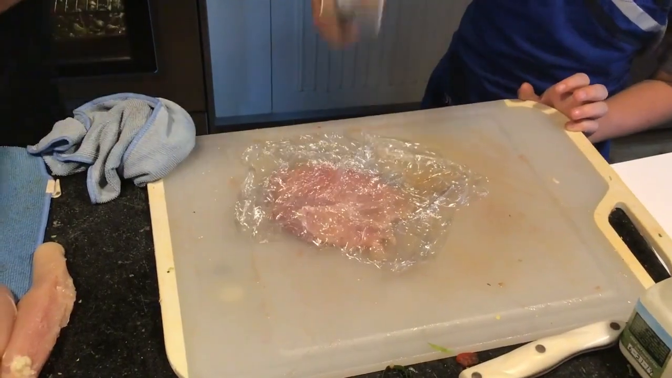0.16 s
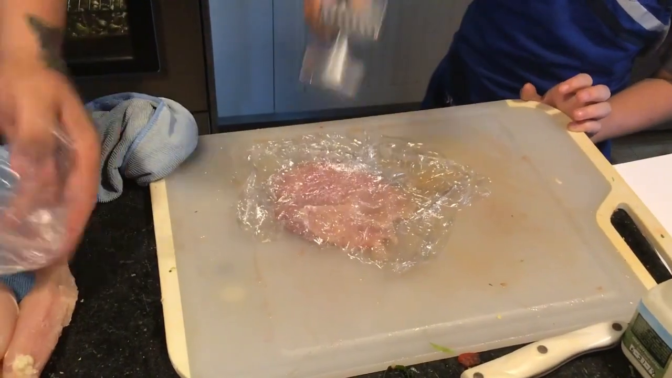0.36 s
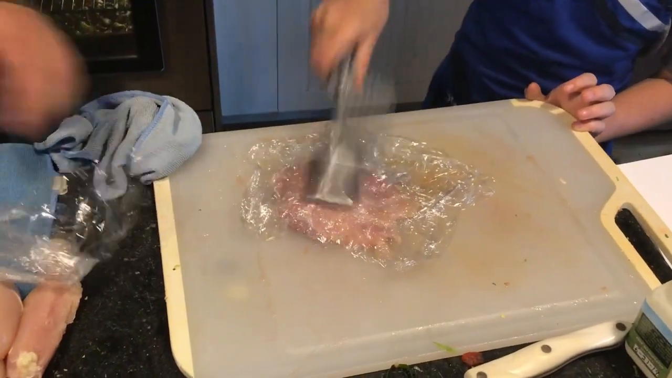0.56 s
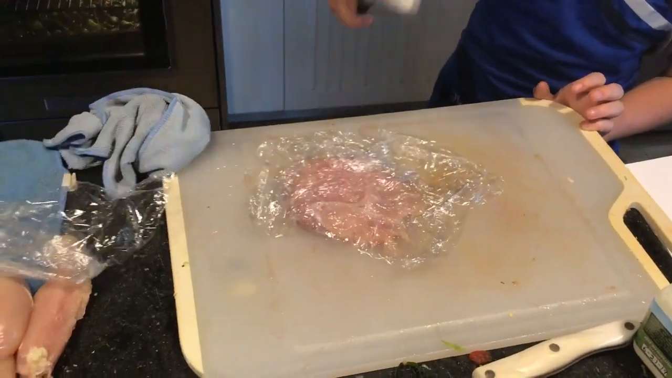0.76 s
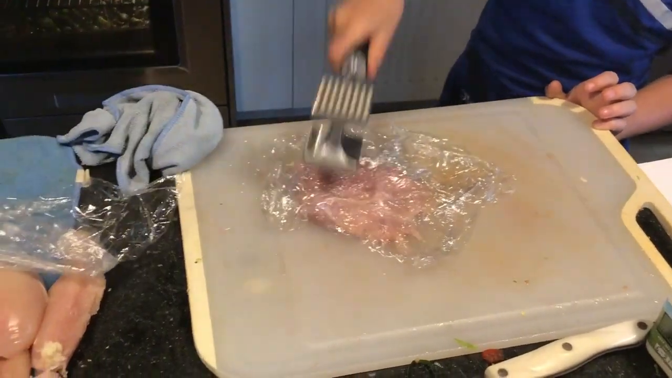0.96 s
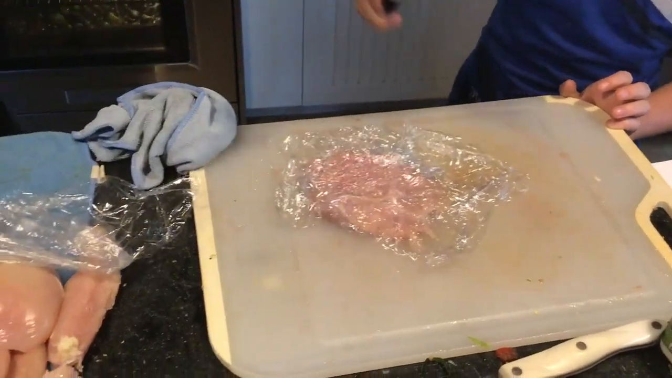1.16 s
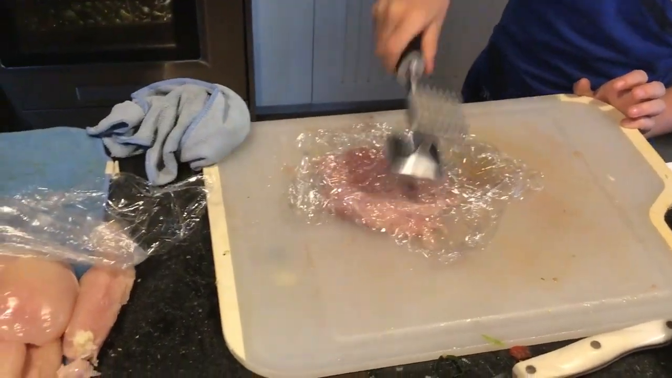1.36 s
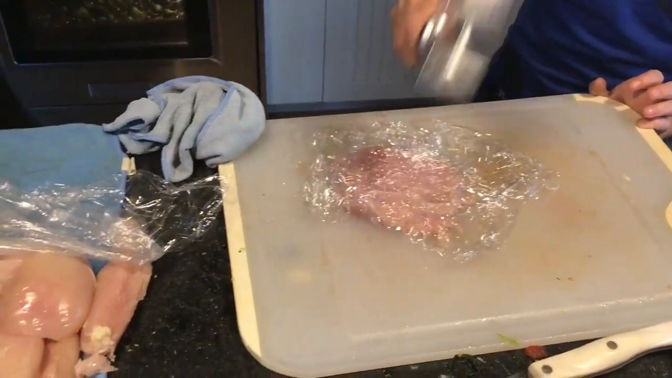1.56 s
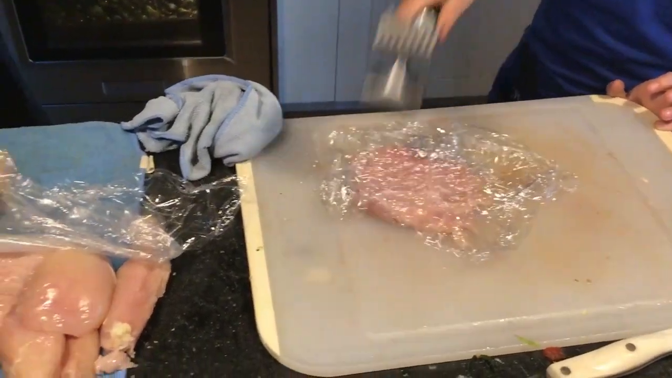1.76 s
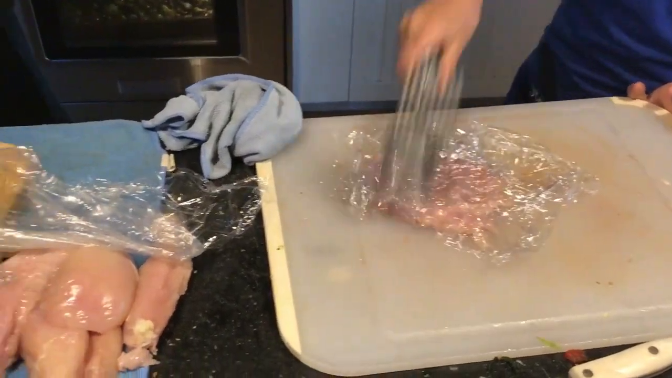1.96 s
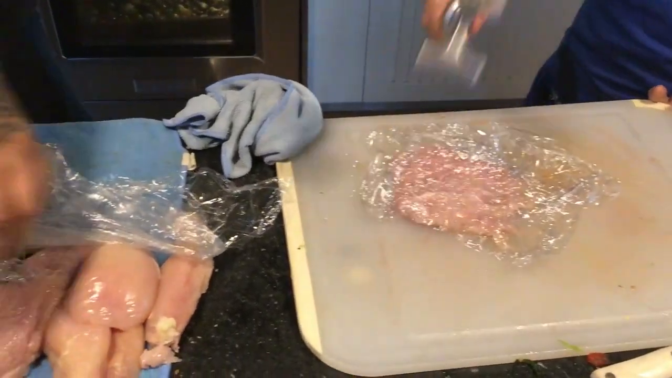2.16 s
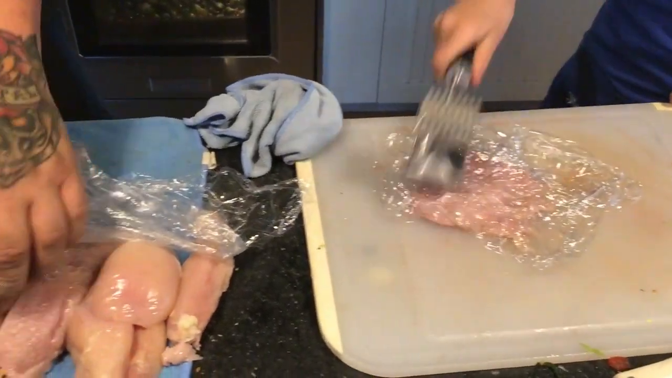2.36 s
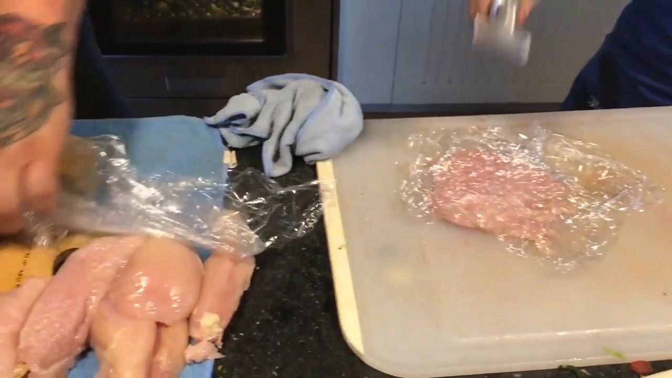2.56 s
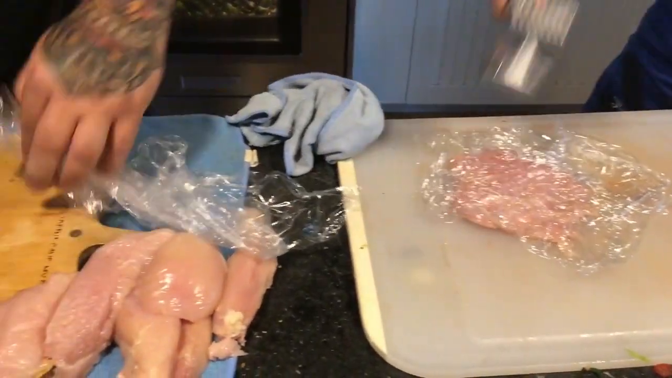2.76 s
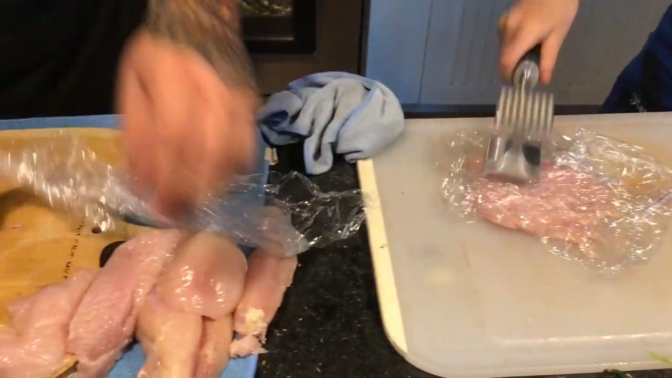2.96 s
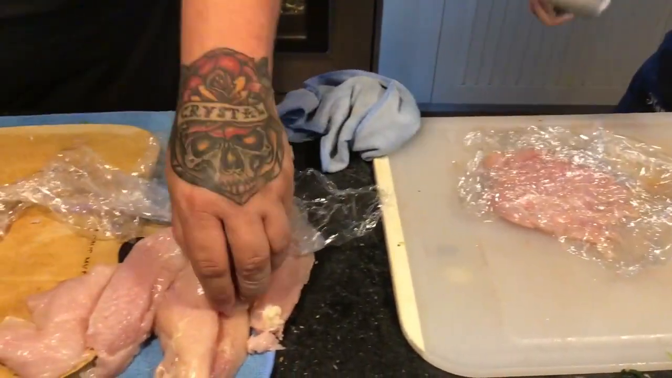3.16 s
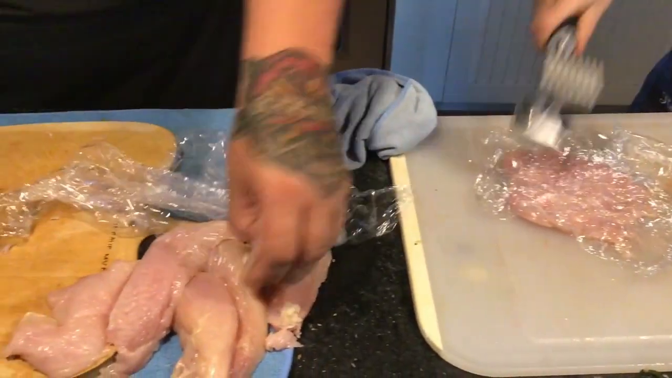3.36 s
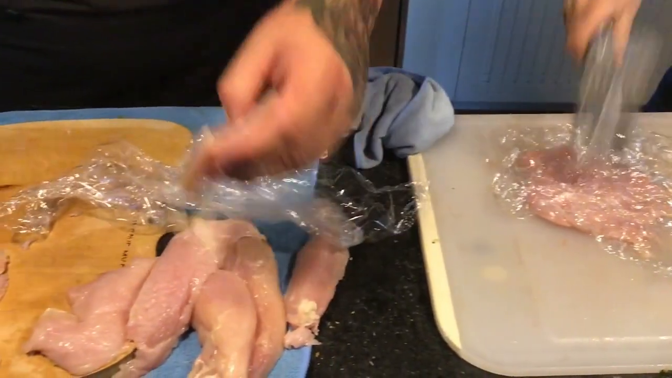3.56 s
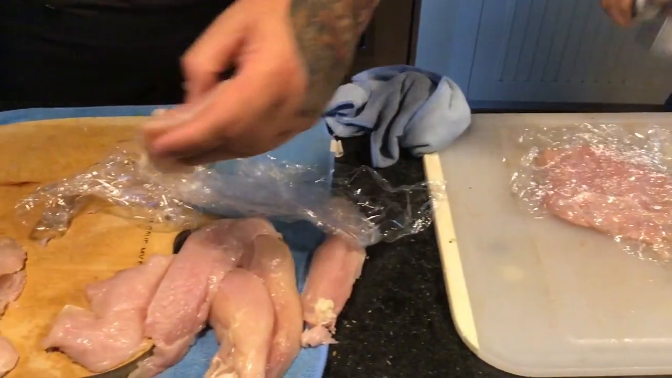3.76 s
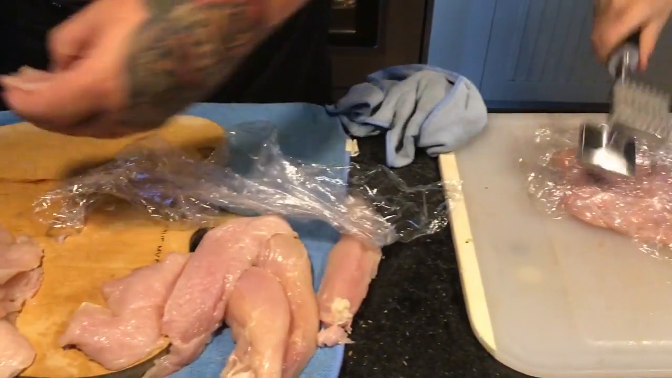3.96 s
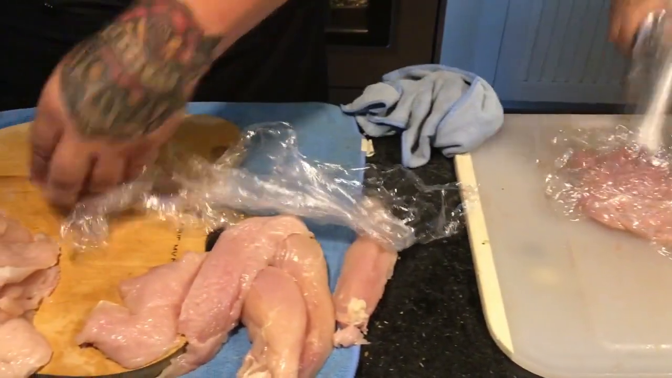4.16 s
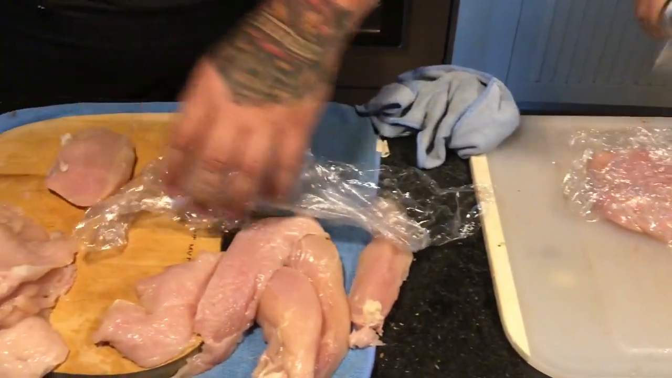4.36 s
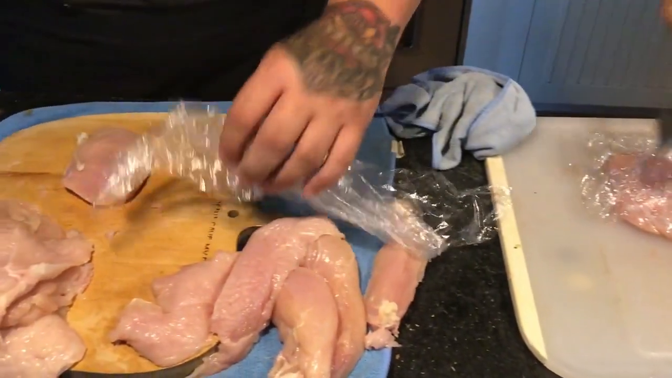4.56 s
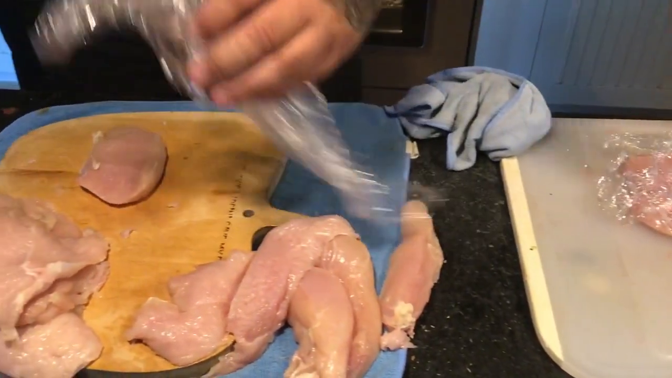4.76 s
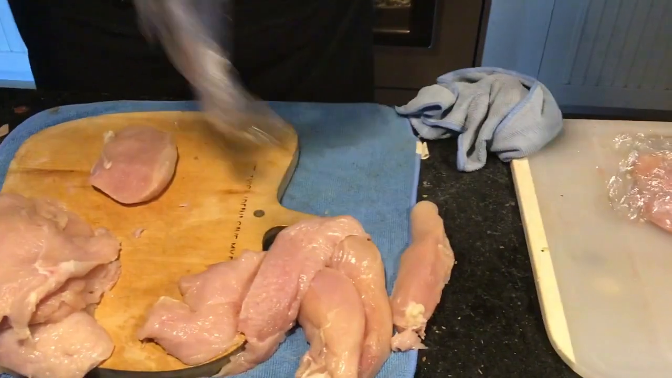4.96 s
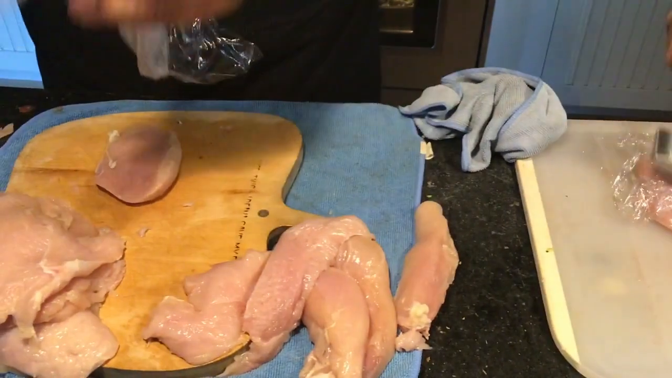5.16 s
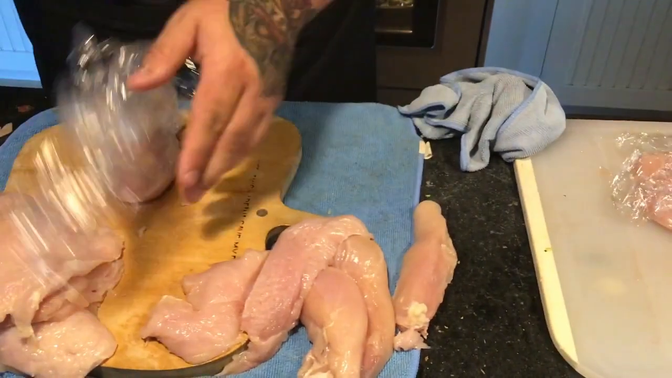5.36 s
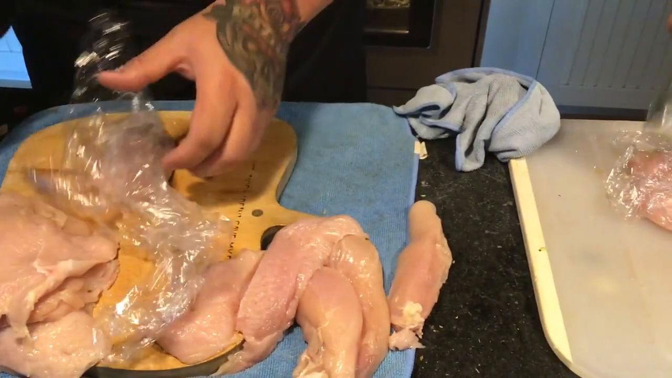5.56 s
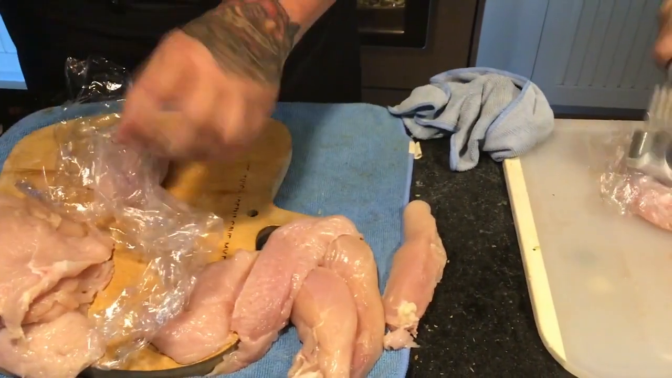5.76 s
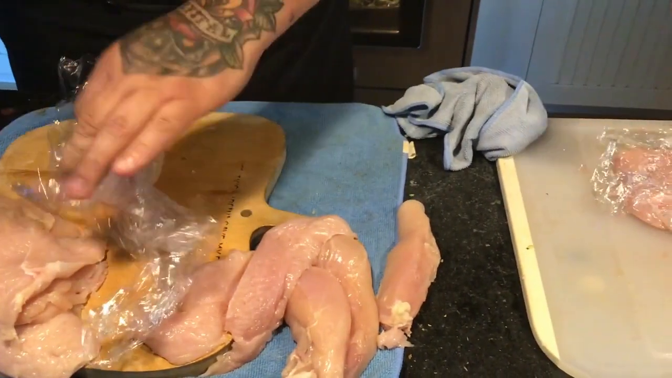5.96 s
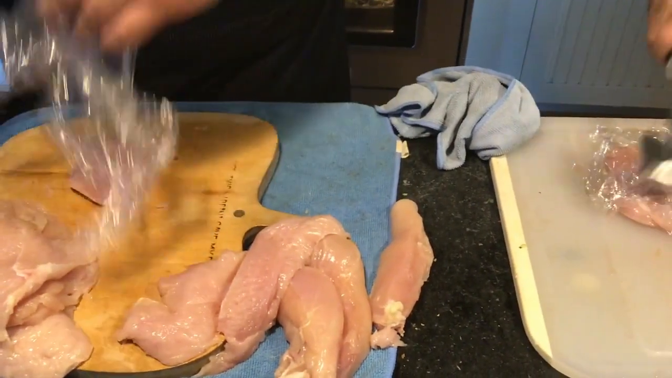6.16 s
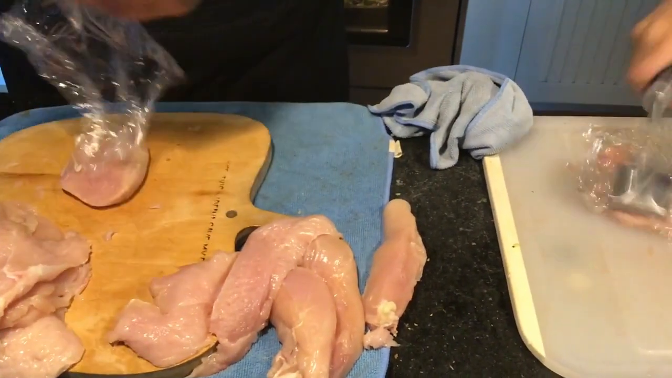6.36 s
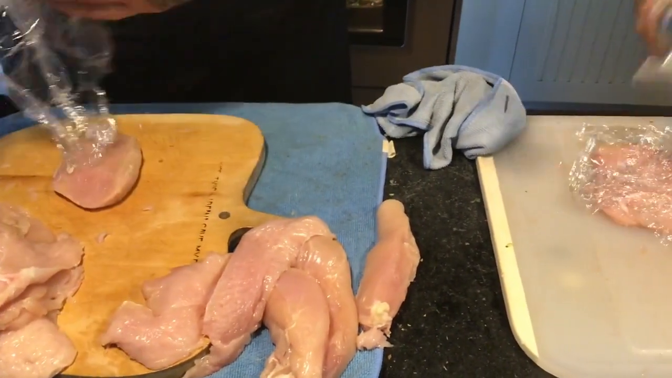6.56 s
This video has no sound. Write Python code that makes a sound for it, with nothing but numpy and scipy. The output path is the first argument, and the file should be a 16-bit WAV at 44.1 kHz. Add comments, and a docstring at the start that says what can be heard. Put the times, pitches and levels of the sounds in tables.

```python
"""Wet slaps and knocks, about three a second: a metal mallet pounds a chicken breast under plastic wrap
on a plastic cutting board, close to a stereo microphone pair in a home kitchen. Each blow slaps the film
with a puff of trapped air; some 4 ms later the meat is squeezed flat and the board knocks on the counter.
Beside it someone handles a second sheet of wrap, which rustles, snaps and swishes, and hands and meat
bump softly on the boards. The kitchen rings briefly behind it all, over a faint room tone."""
import sys
import numpy as np
from scipy import signal
from scipy.fft import rfft, irfft, next_fast_len
from scipy.io import wavfile

SR = 44100
rng = np.random.default_rng(int(sys.argv[2]) if len(sys.argv) > 2 else 0)


def inscribe(sig):
    """Save sig as 16-bit PCM at rate SR to the path in sys.argv[1].

    A 1-D sig is mono; a 2-D sig holds one channel per row.
    Samples are clipped to [-1, 1] before scaling.
    """
    pcm = np.round(np.clip(np.atleast_2d(sig).T, -1, 1) * 32767)
    wavfile.write(sys.argv[1], SR, pcm.astype(np.int16))


N = 291627
LEAD = SR // 4   # samples before time zero: the first blow lands just ahead of it
SPAN = next_fast_len(N + LEAD, real=True)

# mallet blows: (time [s], slap [dB], squirt pitch [Hz], air puff [dB], squeeze time [ms], knock [dB],
# board pitch [ratio])
BLOWS = [ (-.062, 4.5, 5940, -7, 4, 10.5, 0.91), (0.288, 9, 8500, 1, 4.1, 11, 1.04),
         (0.6338, 9.5, 6700, 2, 4, 12, 1.03), (.9801, 12, 8500, 4, 4.3, 14, 1.073),
         (1.3382, 10, 7200, 4.5, 4, 12, .97), (1.6854, 5.5, 5020, 0.5, 3.8, 9.5, 1.035),
         (2.0433, -0.5, 7000, -1, 3.5, 8, 1.08), (2.3851, -5.5, 5750, 1.5, 4, 6, 1.02),
         (2.7005, -4.5, 5340, -8, 6.5, 8, .98), (3.0198, 12, 7330, 0.5, 4.2, 12.5, 0.96),
         (3.3369, 4.5, 6640, -7, 4.3, 12.5, 1.015), (3.647, 5, 5190, 7, 4.4, 12.5, 0.96),
         (3.9588, 5, 5000, -1.5, 4.1, 8.5, 1.02), (4.2555, 11, 3730, 3, 4.5, 13, 1.02),
         (4.556, 5, 4080, 5, 4, 12, 1.003), (4.873, 8.5, 7500, 9.5, 4.6, 13, 1.01),
         (5.191, 14.5, 3200, 7.5, 5.6, 13.5, 1), (5.517, 6.5, 5500, 7, 4.9, 14, 0.92),
         (5.8234, 7, 5900, 9.5, 5.1, 13, 0.96), (6.148, 3, 3320, -3, 5.2, 6.5, 1),
         (6.4297, 7.5, 3460, 5.5, 3.3, 11.5, 1.03)]
# hiss of the wet film: (frequency [Hz], spectral level [dB])
SLAP_COLOUR = [(400, -27), (1200, 2), (2000, -4), (5000, -5.5), (7500, -5.5), (10500, -4), (13000, -10.5),
               (16000, -11.5)]
# board under the meat; stiffer spots favour other modes: (frequency [Hz], relative level [dB], t60 [s],
# share struck again by the rebound [ratio], level change [dB per unit of pitch ratio])
BOARD_MODES = [(215, -8, 0.025, 0.029, 5.5), (244, -9.5, .02, 0.062, 12), (456, -15, 0.039, 0.77, 0),
               (705, -0.5, 0.03, 0.18, -1), (1098, -7.5, 0.027, 0.98, 17), (1605, -11.5, 0.023, .9, 2)]
# hard contact of head and board: (frequency [Hz], spectral level [dB])
CRACK_COLOUR = [(500, -14), (1100, -19), (1900, 4.5), (3200, 2), (4500, 4), (6200, 0), (8000, -14.5),
                (12000, -14), (16000, -30.5)]
# counter under the board: (frequency [Hz], relative level [dB], t60 [s])
COUNTER_MODES = [(590, -49, 0.24), (683, -37.5, 0.6), (720, -42, 0.5), (800, -42.5, 0.48),
                 (966, -43.5, 0.55), (1224, -46, 0.27)]
# low standing waves of the kitchen: (frequency [Hz], relative level [dB], t60 [s])
ROOM_MODES = [(83.85, -47, 0.66), (134.2, -39.5, 0.43), (168.5, -45, .4), (175.4, -42, 0.4),
              (213.4, -45, .45)]
# reverberation of the kitchen: (frequency [Hz], level [dB])
ROOM_COLOUR = [(60, -5), (130, -11), (220, -8.5), (350, -4), (700, -9.5), (1100, -8), (2000, -10),
               (4500, -6.5), (8000, -9.5), (12000, -9.5), (16000, -18)]
# its decay: (frequency [Hz], t60 [s])
ROOM_T60 = [(100, 0.93), (300, 0.44), (700, 0.47), (2000, 0.44), (5000, 0.45), (9000, 0.34), (15000, 0.24)]
# its likeness at the two microphones: (frequency [Hz], correlation [ratio])
ROOM_LIKENESS = [(60, 0.95), (180, 0.94), (550, 0.55), (1650, 0.61), (4970, 0.5), (15000, 0.37)]
# steady background: (frequency [Hz], spectral level [dB])
ROOM_TONE_COLOUR = [(25, 8.5), (60, 2), (100, -6.5), (140, 0), (300, -8.5), (700, -9.5), (1500, -15),
                    (3000, -22), (6000, -28.5), (10000, -28), (16000, -48)]
# pulls on the second sheet: (time [s], length [s], level [dB])
SLIDES = [(.085, .02, -49.5), (.17, 0.17, -61), (2.5, 0.27, -63), (2.82, 0.027, -71.5),
          (3.29, 0.015, -68.5), (4.66, 0.042, -62), (6.07, .06, -62), (6.57, 0.052, -73)]
# rustle of that sheet: (frequency [Hz], spectral level [dB])
SLIDE_COLOUR = [(500, -2), (1500, -1.5), (4000, -1), (8000, -2), (12000, -2.5), (16000, -15.5)]
# sharp snaps of the wrap: (time [s], level [dB], pitch [Hz])
SNAPS = [(.9, -22.5, 5930), (.925, -32, 7000), (1.256, -36, 8000), (1.303, -38, 8000), (1.979, -26, 7620),
         (2.004, -18.5, 2000), (3.25, -35, 7930), (4.1927, -16.5, 2360)]
# hands and meat on the boards: (time [s], level [dB])
BUMPS = [(2.625, -22), (2.654, -28.5), (3.859, -35.5), (5.419, -24.5), (6.062, -25.5), (6.372, -18)]
# swings of the second sheet through the air: (time [s], length [s], level [dB])
SWISHES = [(5.56, 0.086, -60.5), (5.98, 0.14, -70)]
# balance of the microphone pair: (frequency [Hz], left over right [dB])
MIC_BALANCE = [(60, 5.5), (92, -1.5), (140, -0.5), (210, -7), (330, 1.5), (500, -1.5), (770, 1),
               (1170, -0.5), (1790, 0.5), (2740, -0.5), (4190, 1.0), (6410, 2), (9810, 1.5), (15000, -2)]
# phase between the microphones: (frequency [Hz], lead of the left [rad])
MIC_PHASE = [(0, 0), (1290, 0.22), (2580, -0.83), (3620, 0.48), (4570, 0.89), (5680, 0.68), (6120, 0.23),
             (7320, -0.28), (8960, -0.76), (9730, -1.2), (10200, -0.66), (11200, -0.052), (12600, 0.1),
             (16000, -0.1)]


def from_db(db):
    """Decibels to gain."""
    return 10 ** (np.asarray(db) / 20)


def unit(x):
    """Scale to an energy of one."""
    return x / np.sqrt(np.sum(x ** 2) + 1e-20)


def at_hz(points, hz):
    """Read a table on a log-frequency axis."""
    f, value = np.transpose(points)
    return np.interp(np.log(np.maximum(hz, 1)), np.log(f), value)


def coloured(x, spectrum):
    """Give a noise its spectrum."""
    size = x.shape[-1]
    return irfft(rfft(x) * from_db(at_hz(spectrum, np.fft.rfftfreq(size, 1 / SR))), size)


def ring(t, hz, t60):
    """A damped sine that starts at t = 0."""
    t = np.maximum(t, 0)
    return np.sin(2 * np.pi * hz * t) * from_db(-60 * t / t60)


def resonance(x, hz, width_hz):
    """Two-pole band-pass with gain one on top."""
    r = np.exp(-np.pi * width_hz / SR)
    feedback = [1, -2 * r * np.cos(2 * np.pi * hz / SR), r * r]
    return signal.lfilter(np.array([1, 0, -1]) * (1 - r * r) / 2, feedback, x)


def fade(t, ms):
    """Sudden start at t = 0, exponential fall."""
    return (t >= 0) * np.exp(-np.abs(t) * 1000 / ms)


def add(track, s, sound):
    """Mix a sound into a track that begins LEAD samples early."""
    i = LEAD + round(s * SR)
    track[i:i + len(sound)] += sound[:SPAN - i]


def film_slap(t, hz, length_ms, squirt_gain=0.8, crumple_gain=0.097, crumple_ms=2.0):
    """The film crumples under the falling head, then air and juice squirt out through a narrowing gap."""
    hiss = coloured(rng.standard_normal(len(t)), SLAP_COLOUR)
    squirt = squirt_gain * resonance(hiss, hz, width_hz=1100)
    burst = fade(t, 1.3 * length_ms) + fade(-t, 0.32 * length_ms)   # fade(-t) is the swell up to t = 0
    crumple = fade(t, 0.8 * crumple_ms) + fade(-t, 0.71 * crumple_ms * length_ms)
    return unit((hiss + squirt) * (burst + crumple_gain * crumple))


def air_puff(t, hz=590, t60=0.019, lead_s=0.00037):
    """The pocket of air under the head gives a short hollow pop as it is pinched off."""
    return unit(-ring(t + lead_s, hz, t60))


def plate_mode(t, hz, t60, rise_ms=0.12):
    """A plate thrown into motion: the pressure jumps at once, then swings and dies."""
    t = np.maximum(t, 0)
    return (1 - fade(t, rise_ms)) * np.cos(2 * np.pi * hz * t) * from_db(-60 * t / t60)


def board_knock(t, pitch, rebound_s=0.001648, crack_db=-6.5, crack_ms=0.83, scatter_db=3.5):
    """The head bottoms out on the board, and the board hits the counter just after."""
    t_rebound = t - rebound_s / pitch
    body = 0
    for hz, db, t60, share, spot_db in BOARD_MODES:
        strength = from_db(db + spot_db * (pitch - 1) + scatter_db * rng.standard_normal())
        strike = plate_mode(t, hz * pitch, t60)
        rebound = share * plate_mode(t_rebound, hz * pitch, t60)
        body += strength * (strike + rebound)
    contacts = 0.54 * fade(t, crack_ms) + fade(t_rebound, crack_ms)
    crack = coloured(rng.standard_normal(len(t)), CRACK_COLOUR) * contacts
    return unit(unit(body) + from_db(crack_db) * unit(crack))


def ringing_modes(t, modes, scatter_db=2):
    """Long resonances, each struck a little differently every time."""
    return sum(from_db(db + scatter_db * rng.standard_normal()) * ring(t, hz, t60)
               for hz, db, t60 in modes)


def mallet(slap_halving_db=12, usual_knock_db=11.5, low_cut_hz=72):
    """All blows: the close slap, puff and knock, and the ring they leave in counter and room."""
    direct, ringing = np.zeros((2, SPAN))
    t = np.arange(-512, 3584) / SR
    t_ring = np.arange(SR // 2) / SR
    for s, slap_db, squirt_hz, puff_db, squeeze_ms, knock_db, pitch in BLOWS:
        squeeze_s = squeeze_ms / 1000
        slap_ms = 1.76 * .5 ** (slap_db / slap_halving_db)   # a louder slap is over sooner
        slap = from_db(slap_db) * film_slap(t, squirt_hz, slap_ms)
        puff = from_db(puff_db) * air_puff(t)
        knock = from_db(knock_db) * board_knock(t - squeeze_s, pitch)
        add(direct, s + t[0], slap + puff + knock)
        standing_waves = from_db(knock_db) * ringing_modes(t_ring, ROOM_MODES)
        # hard knocks press through the meat into the counter
        counter_db = 2.5 + 2.6 * (knock_db - usual_knock_db)
        counter = from_db(counter_db) * ringing_modes(t_ring, COUNTER_MODES)
        add(ringing, s + squeeze_s, standing_waves + counter)
    # steep low cut: the blows and their ringing are heard without deep bass
    low_cut = signal.butter(8, low_cut_hz, "high", fs=SR, output="sos")
    return signal.sosfilt(low_cut, np.array([direct, ringing]) + 1e-18)


def near_echoes(x, count=24, first_s=0.011, last_s=.06, level_db=-26, t60=0.58, mic_lag_s=.00007):
    """Counter, cupboards and bodies throw back single echoes, each from its own side."""
    response = np.zeros((2, SR // 4))
    for when, side, sign in rng.uniform(-1, 1, (count, 3)):
        delay = first_s + (last_s - first_s) * abs(when)
        arrivals = np.round((delay + side * mic_lag_s * np.array([1, -1])) * SR).astype(int)
        response[[0, 1], arrivals] += np.sign(sign) * from_db(level_db - 60 * delay / t60)
    return signal.fftconvolve(x[None], response, axes=1)[:, :SPAN]


def diffuse_noise():
    """Stereo white noise, as alike at both microphones as the room makes it."""
    alike = np.clip(at_hz(ROOM_LIKENESS, np.fft.rfftfreq(SPAN, 1 / SR)), 0, .99)
    mid, side = rfft(rng.standard_normal((2, SPAN)))
    return irfft(np.sqrt((1 + alike) / 2) * mid + np.sqrt((1 - alike) / 2) * side * [[1], [-1]], SPAN)


def linger(power, t60):
    """Spread energy over an exponential decay."""
    r = from_db(-120 / (t60 * SR))
    return signal.lfilter([1 - r], [1, -r], power + 1e-18)


def kitchen(x, build_s=0.013, early_t60=0.13):
    """Near echoes, then a diffuse field that stores each band's energy and loses the treble first."""
    hz = np.fft.rfftfreq(SPAN, 1 / SR)
    white = rfft(diffuse_noise())
    edges_hz = np.geomspace(65, 17000, 21)
    out = near_echoes(x)
    for low, high in zip(edges_hz, edges_hz[1:]):
        centre = np.sqrt(low * high)
        band = signal.sosfilt(signal.butter(2, [low, high], "band", fs=SR, output="sos"), x + 1e-18)
        fed = linger(band ** 2, build_s)
        stored = linger(fed, at_hz(ROOM_T60, centre)) + linger(fed, early_t60)
        envelope = np.sqrt(stored * SR / 2 / (high - low))
        overlapping_band = np.interp(hz, [centre * low / high, centre, centre * high / low], [0, 1, 0])
        field = irfft(white * overlapping_band, SPAN)
        out += field * envelope * from_db(at_hz(ROOM_COLOUR, centre))
    return out


def room_tone(level_db=-60):
    """A faint, steady rumble and hiss from all around the microphones."""
    noise = coloured(diffuse_noise(), ROOM_TONE_COLOUR)
    return from_db(level_db) * noise / noise.std()


def hand_movements(rows, attack_s=0.027, release_s=.065):
    """Gain of a series of movements of the sheet: each swells, holds and dies away."""
    t = (np.arange(SPAN) - LEAD) / SR
    gain = 0
    for s, length, db in rows:
        before, after = np.maximum(s - t, 0), np.maximum(t - s - length, 0)
        gain += from_db(db) * np.exp(-before / attack_s - after / release_s)
    return gain


def wrap_slide(ticks_per_s=5000, size_spread_db=3.5, settling_db=-76):
    """Sliding film sheds dense tiny ticks and the odd larger crinkle; it ticks faintly between pulls."""
    sizes = from_db(size_spread_db * np.minimum(rng.exponential(1, SPAN), 5))
    signs = rng.choice([-1, 1], SPAN)
    ticks = rng.random(SPAN) < ticks_per_s / SR
    rustle = coloured(ticks * sizes * signs, SLIDE_COLOUR)
    return rustle / rustle.std() * (hand_movements(SLIDES) + from_db(settling_db))


def wrap_snaps(decay_ms=1.8, width_hz=5000):
    """Creases of the film buckle one at a time."""
    out, t = np.zeros(SPAN), np.arange(SR // 20) / SR
    for s, db, hz in SNAPS:
        snap = resonance(rng.standard_normal(len(t)), hz, width_hz) * fade(t, decay_ms)
        add(out, s, from_db(db) * unit(snap))
    return out


def board_bumps(hz=95, width_hz=70, decay_ms=25):
    """Hands and meat make soft, dull contacts with the boards."""
    out, t = np.zeros(SPAN), np.arange(SR // 5) / SR
    for s, db in BUMPS:
        contact = rng.standard_normal(len(t)) * fade(t, decay_ms)
        thud = resonance(resonance(contact, hz, width_hz), hz, width_hz)
        add(out, s, from_db(db) * unit(thud))
    return out


def wrap_swish(hz=4900, width_hz=2800):
    """Film dragged through the air hisses in one broad band."""
    hiss = resonance(resonance(rng.standard_normal(SPAN), hz, width_hz), hz, width_hz)
    return hiss / hiss.std() * hand_movements(SWISHES)


def scene(blow_send_db=-3, ringing_db=-7.5):
    """Mallet and wrap close to the microphones, the kitchen around them."""
    blows, ringing = mallet()
    handling = wrap_snaps() + wrap_slide() + wrap_swish() + board_bumps()
    room = kitchen(from_db(blow_send_db) * blows + handling) + from_db(ringing_db) * ringing
    return (blows + handling + room + room_tone())[:, LEAD:]


def record(dry, cutoff_hz=15800):
    """Two closely spaced microphones differ in level and phase; top peaks overload, the treble is cut."""
    size = next_fast_len(N + LEAD)
    hz = np.fft.rfftfreq(size, 1 / SR)
    # each side takes half of the difference
    left = from_db(at_hz(MIC_BALANCE, hz) / 2) * np.exp(.5j * at_hz(MIC_PHASE, hz))
    heard = irfft(rfft(dry, size) * np.array([left, 1 / left]), size)[:, :N]
    high_cut = signal.ellip(10, .1, 70, cutoff_hz, fs=SR, output="sos")
    return signal.sosfilt(high_cut, np.clip(heard, -1, 1))


dry = scene()
out = record(dry)
inscribe(out)
```